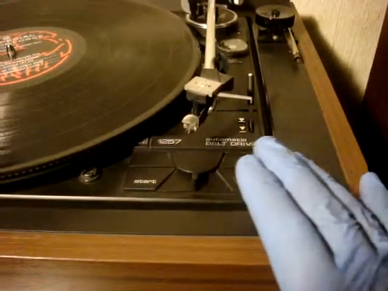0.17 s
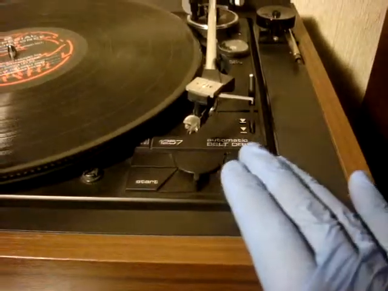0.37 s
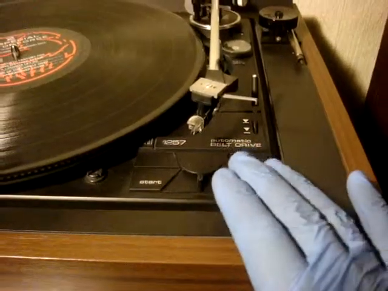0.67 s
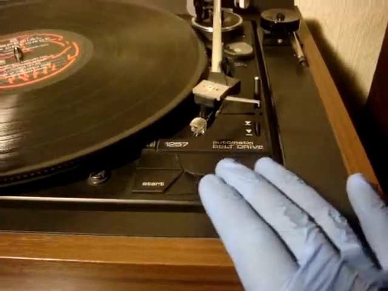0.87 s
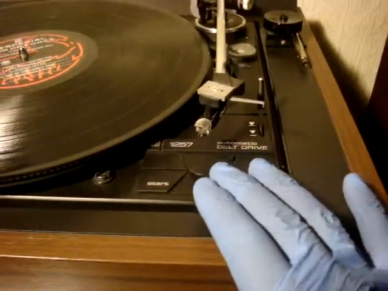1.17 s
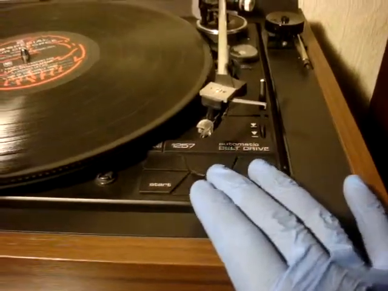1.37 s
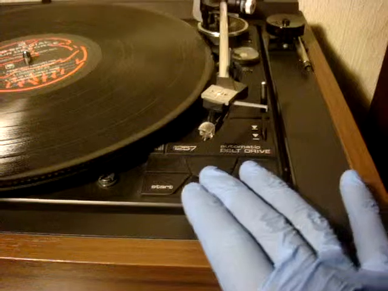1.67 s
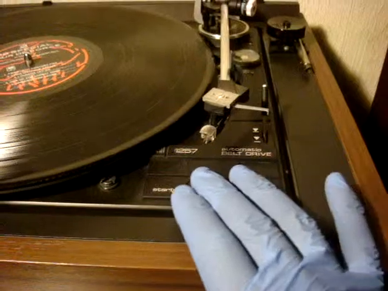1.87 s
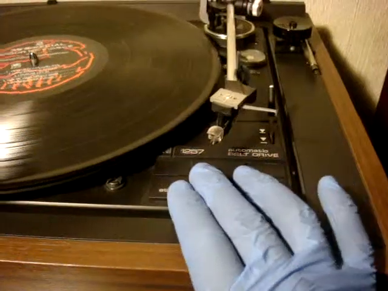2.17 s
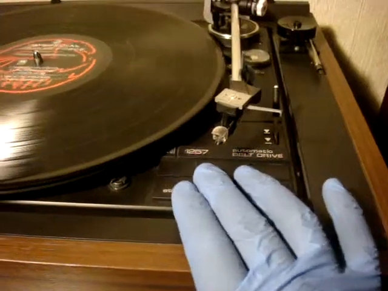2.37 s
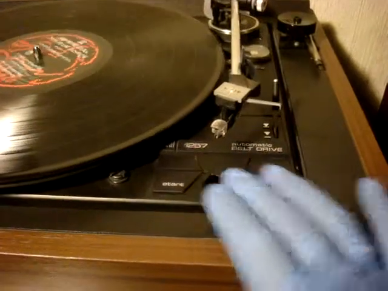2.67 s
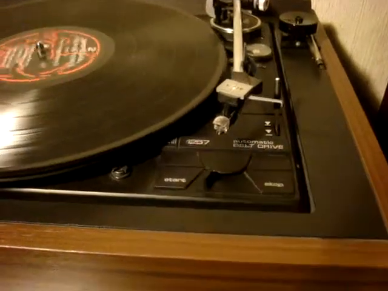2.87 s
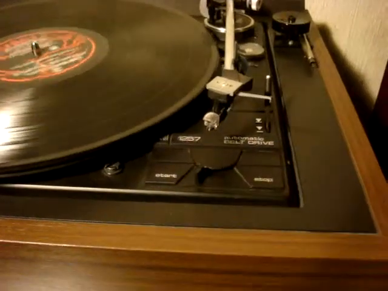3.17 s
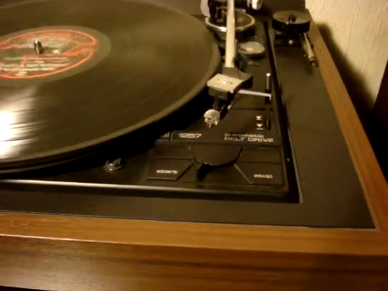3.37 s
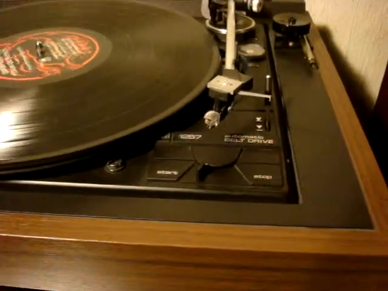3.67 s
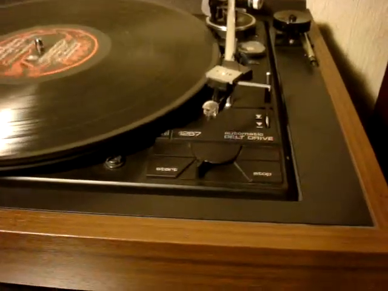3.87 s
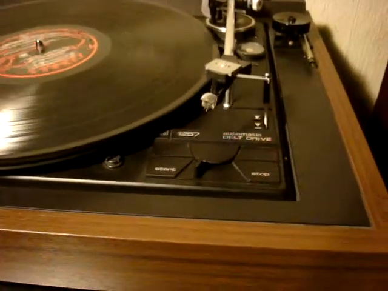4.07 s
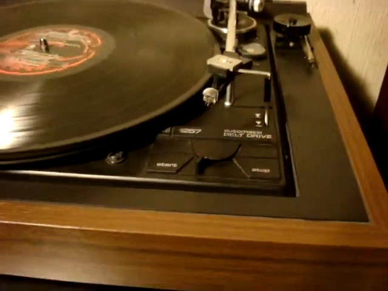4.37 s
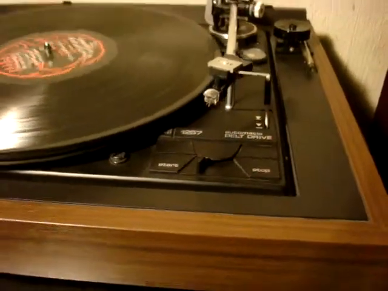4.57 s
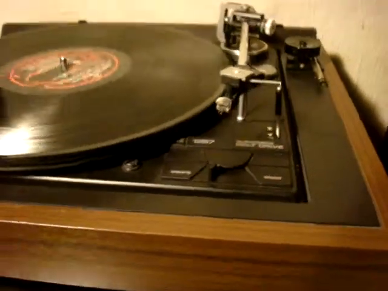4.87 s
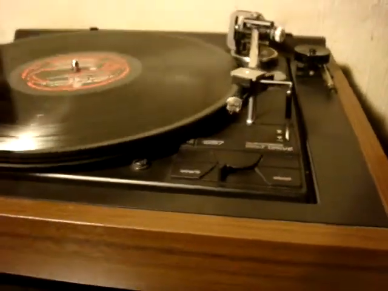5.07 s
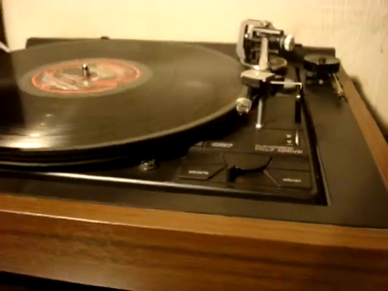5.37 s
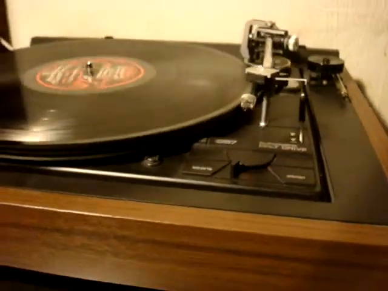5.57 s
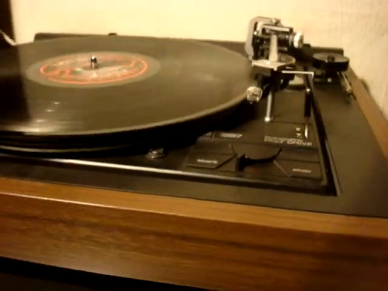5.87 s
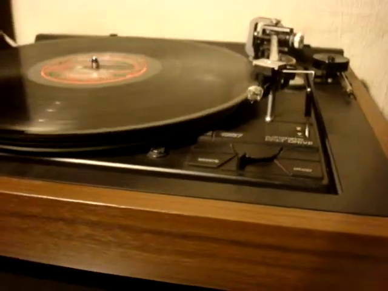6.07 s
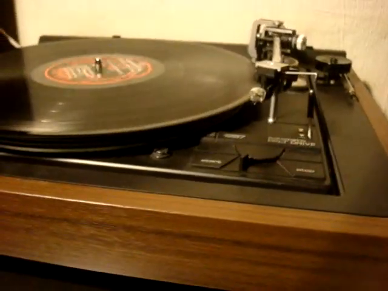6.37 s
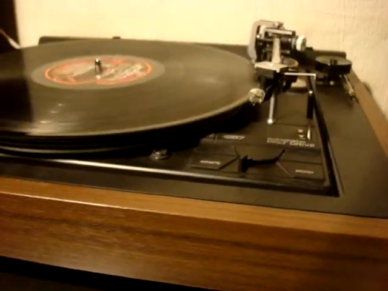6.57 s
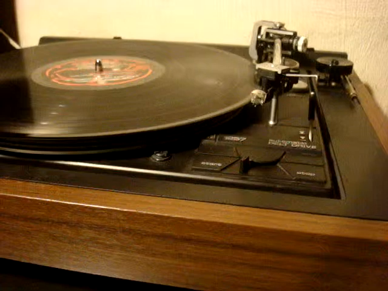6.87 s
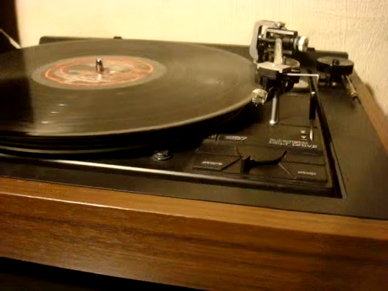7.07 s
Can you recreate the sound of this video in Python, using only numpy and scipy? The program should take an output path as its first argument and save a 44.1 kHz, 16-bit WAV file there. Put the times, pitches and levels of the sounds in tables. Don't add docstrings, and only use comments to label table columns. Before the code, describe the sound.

A quiet room heard through a small camera microphone close to an automatic record player. Soft, steady, rather dull hiss runs for the full 7 seconds, with a barely audible, slightly unsteady motor whine inside it. At about 1.87 s the start lever snaps: a short, hollow, modest click with a tiny rattle, and a faint tick at 2.0 s. Another very faint tick comes at 2.7 s, then a gloved hand slides off with a soft bright rustle around 2.9 s. At 3.11 s a latch springs over, sharp and the loudest sound, followed at 3.15 s by a dry cam strike with a brief steel-deck ring. A small tick follows at 3.33 s. At 3.92 s the arm lift ticks, rounder and lower. At 5.17 s it meets its stop with a bright, rattly clack. Only hiss and whine remain to the end.

```python
import sys
import numpy as np
from scipy import signal
from scipy.fft import rfft, irfft, next_fast_len
from scipy.io import wavfile
from scipy.ndimage import uniform_filter1d

SR = 44100
rng = np.random.default_rng(int(sys.argv[2]) if len(sys.argv) > 2 else 0)


def undo_db(level):
    steps = np.asarray(level, float) / 20
    return 10 ** steps


def dump_mix(stems):
    frames = np.atleast_2d(stems).T
    limited = np.clip(frames, -1, 1)
    pcm = np.round(limited * 32767).astype(np.int16)
    wavfile.write(sys.argv[1], SR, pcm)


N = 318310


def rms_at(x, db):
    return x * undo_db(db) / np.sqrt(np.mean(x ** 2))


def add(out, sound, start_s, peak_db):
    start = int(start_s * SR)
    out[start:start + len(sound)] += undo_db(peak_db) * sound / np.max(np.abs(sound))


def band(x, low_hz, high_hz, edge_hz=140.0):
    padded = np.pad(x, (0, next_fast_len(len(x) + 256) - len(x)), "wrap")
    hz = np.fft.rfftfreq(len(padded), 1 / SR)
    above_low = np.clip((hz - low_hz) / edge_hz + 0.5, 0, 1)
    below_high = np.clip((high_hz - hz) / edge_hz + 0.5, 0, 1)
    return irfft(rfft(padded) * above_low * below_high, len(padded))[:len(x)]


def rattle(rise_ms, rattle_ms, count):
    ms = np.arange(SR // 5) * 1000 / SR
    rise = np.clip(ms / max(rise_ms, 0.1), 0, 1)
    decay = np.exp(-np.maximum(ms - rise_ms, 0) / max(rattle_ms, 0.2))
    return rng.standard_normal((count, len(ms))) * rise * decay


def ring(push, hz, t60_s):
    pole = np.exp(2j * np.pi * hz / SR - np.log(1000) / (max(t60_s, 0.002) * SR))
    return signal.lfilter([1], [1, -pole], push).imag


def blows(events, modes):
    out = np.zeros(N)
    for start_s, peak_db, rise_ms, rattle_ms, crack_db in events:
        contacts = rattle(rise_ms, rattle_ms, count=len(modes) + 1)
        body = sum(rms_at(ring(push, hz, t60_s), db) for push, (hz, db, t60_s) in zip(contacts, modes))
        crack = rms_at(np.diff(contacts[-1], prepend=0), crack_db)
        add(out, body + crack, start_s, peak_db)
    return out


# first contact in seconds, peak in dB, rise in ms, rattle in ms, crack in dB.
LATCH_BLOWS = [
    (3.1105, -18.5, 1.4, 3.7, 5.5),
    (3.1128, -18, 0.58, 2.9, -3.5),
    (3.1164, -20, 0.64, 4, -10),
    (3.120, -28.5, 0.93, 4.4, -13),
]
# pitch in Hz, level in dB, t60 in seconds.
LATCH_MODES = [(528, -16, 0.081), (1008, -11, 0.062), (1652, -8, 0.043), (2470, -8, 0.019),
               (3120, -5.5, 0.012), (3940, -3.5, 0.007), (4560, -7, .012), (5400, -10, .01),
               (6470, -11, 0.014), (7050, -8.5, 0.02), (8530, -9, 0.022), (9400, -10, 0.0056)]


def latch():
    return blows(LATCH_BLOWS, LATCH_MODES)


# first contact in seconds, peak in dB, rise in ms, rattle in ms, crack in dB.
CAM_BLOWS = [
    (3.1535, -23.5, 0.29, 2.2, -11),
    (3.157, -22.5, 0.61, 3, -14),
    (3.161, -27.5, 0.98, 9, -2.5),
    (3.169, -38.5, 0.68, 9.2, -16),
]
# pitch in Hz, level in dB, t60 in seconds.
CAM_MODES = [(594, -8, 0.012), (830, -27, 0.018), (1015, -6, 0.025), (1310, -18, 0.034), (1730, -3, 0.034),
             (2100, -12.5, 0.011), (2570, -4.5, 0.016), (3000, -4, 0.013), (3330, -11, 0.012),
             (4020, -7, 0.0073), (4480, -8.5, .01), (6130, -17, 0.0055), (7340, -19, 0.0056)]
# first contact in seconds, peak in dB, rise in ms, rattle in ms, crack in dB.
DECK_BLOWS = [
    (3.1535, -24, 0.21, 0.2, -41),
    (3.1605, -23, 0.36, 0.8, -40),
]
# pitch in Hz, level in dB, t60 in seconds.
DECK_MODES = [(930, -4.5, 0.089), (1009, -4, 0.082), (1090, -9, 0.066), (1136, 2.5, 0.11), (1300, -10, 0.1),
              (1696, -11, 0.056)]


def cam():
    return blows(CAM_BLOWS, CAM_MODES) + blows(DECK_BLOWS, DECK_MODES)


# first contact in seconds, peak in dB, rise in ms, rattle in ms, crack in dB.
LEVER_BLOWS = [
    (1.8628, -33, 3.2, 3.4, -14),
    (1.867, -28.5, 1.4, 1.6, -14),
    (1.872, -39, 1.2, 3.9, -14),
    (1.8815, -38, 2.9, 1.7, -7),
    (1.888, -38, 1.5, 3.3, -12),
    (1.893, -47, 1.5, 5.0, -10),
]
# pitch in Hz, level in dB, t60 in seconds.
LEVER_MODES = [(1020, -19, 0.03), (1450, 3.5, 0.027), (2040, -16, 0.009), (2600, 2, 0.009),
               (3220, -4.5, 0.0094), (4500, -10, .005), (8200, -8.5, 0.0018)]


def lever():
    return blows(LEVER_BLOWS, LEVER_MODES)


# first contact in seconds, peak in dB, rise in ms, rattle in ms, crack in dB.
LIFT_BLOWS = [
    (3.9158, -30, 1, 3.7, -9),
    (3.9205, -31.5, 0.65, 2.5, -14),
    (3.925, -38, 0.8, 8.1, -14),
]
# pitch in Hz, level in dB, t60 in seconds.
LIFT_MODES = [(957, -4.5, 0.064), (1200, -5.5, 0.05), (1510, -4, 0.023), (1800, -3, 0.014),
              (2180, -22, .008), (2830, -11.5, 0.0046), (3640, -17, .008), (4400, -22, .006),
              (6140, -22, .01), (8600, -13.5, 0.0066), (9900, -20, .008)]


def lift():
    return blows(LIFT_BLOWS, LIFT_MODES)


# first contact in seconds, peak in dB, rise in ms, rattle in ms, crack in dB.
STOP_BLOWS = [
    (5.1648, -28, 1.6, 2.7, -12),
    (5.168, -28.5, 1.3, 3.9, -2),
    (5.174, -33, 1.1, 2.3, -3),
    (5.177, -33, 1.1, 5.4, -1),
]
# pitch in Hz, level in dB, t60 in seconds.
STOP_MODES = [(613, -9.5, 0.037), (1168, -4, 0.038), (2020, -3, 0.011), (2700, -10, 0.0093),
              (3260, -8, 0.012), (4150, -1, 0.014), (4970, -2.5, 0.012), (5550, -5.5, 0.013),
              (6640, -7.5, 0.0042), (7800, -11, 0.0048), (9750, -15, 0.0061)]


def stop():
    return blows(STOP_BLOWS, STOP_MODES)


# start in seconds, peak in dB, rattle in ms, pitch in Hz, overtone gain in dB.
TICKS = [
    (1.9946, -38.5, 7, 2650, 9),
    (2.714, -46, 5.0, 3300, 4),
    (3.069, -41, 7.4, 2200, 4),
    (3.334, -40.5, 8.5, 2500, -2),
    (3.904, -39, 5, 2420, -15),
    (5.144, -46, 7.2, 4250, -14),
]
# multiple of the pitch, level in dB, share of the overtone gain.
LINK_MODES = [(.6, -3, 0), (1, 3.5, 0), (1.35, -2, 1), (1.72, -9, 1)]


def ticks():
    out = np.zeros(N)
    for start_s, peak_db, rattle_ms, pitch_hz, overtone_db in TICKS:
        contacts = rattle(3.1, rattle_ms, count=len(LINK_MODES))
        tick = 0
        for push, (multiple, db, share) in zip(contacts, LINK_MODES):
            tick = tick + rms_at(ring(push, pitch_hz * multiple, 0.0043), db + share * overtone_db)
        add(out, tick, start_s, peak_db)
    return out


def thud():
    out = np.zeros(N)
    push = rattle(rise_ms=2.0, rattle_ms=3.0, count=1)[0]
    add(out, ring(push, 110.0, 0.015), 3.111, -50)
    return out


# time in seconds, level in dB.
GLOVE = [
    (2.84, -90),
    (2.9, -64),
    (2.95, -58.5),
    (2.99, -74),
    (3.04, -85),
]


def glove():
    s, db = np.transpose(GLOVE)
    rustle = band(rng.standard_normal(N), 3500.0, 9000.0, 2500.0)
    return rms_at(rustle, 0) * undo_db(np.interp(np.arange(N) / SR, s, db, -200, -200))


# frequency in Hz, level in dB per Hz.
HISS = [(20, -17.5), (54, -19), (182, -5), (465, -2), (705, -3.5), (1840, -9.5), (2660, -12),
        (10000, -20.5)]


def hiss():
    hz, db = np.transpose(HISS)
    bins = np.maximum(np.fft.rfftfreq(N, 1 / SR), 1)
    colour = undo_db(np.interp(np.log(bins), np.log(hz), db))
    return rms_at(irfft(rfft(rng.standard_normal(N)) * colour, N), -53)


# pitch in Hz, width in Hz, rms level in dB.
WHINE = [
    (2001, 26, -71),
    (3810, 15, -81),
    (7840, 40, -80.5),
]


def whine():
    return sum(rms_at(ring(rng.standard_normal(N), hz, 2.2 / width_hz), db) for hz, width_hz, db in WHINE)


# start in seconds, length in ms, floor at 4 kHz in dB per Hz.
THINNED = [
    (1.852, 48, -106),
    (3.08, 30, -90),
    (3.11, 43, -95.5),
    (3.153, 34.4, -97.5),
    (3.906, 37, -105),
    (5.131, 34, -103),
    (5.167, 35.6, -94.5),
]


def thin_out(x):
    size, hop = 256, 64
    hz, t, z = signal.stft(x, SR, nperseg=size, noverlap=size - hop, scaling="psd")
    power = 2 * np.abs(z[:-1].reshape(-1, 4, len(t))) ** 2
    power = np.repeat(power, 4, axis=0).mean(axis=1)
    power = uniform_filter1d(power, max(int(5.0 * SR / 1000 / hop), 1), axis=1)
    floor = np.full(len(t), -200.0)
    for start_s, length_ms, db in THINNED:
        floor[(t >= start_s) & (t < start_s + length_ms / 1000)] = db
    climb = 3.5 * np.log2(hz[1:, None] / 4000)
    over_db = 10 * np.log10(np.abs(power) + 1e-20) - floor - climb
    z[:-1] *= undo_db(-67 * (1 - np.tanh(over_db / 0.6)) / 2)
    return signal.istft(z, SR, nperseg=size, noverlap=size - hop, scaling="psd")[1][:N]


def punch_holes(x, count):
    t = np.arange(N) / SR
    for when, length, place, wide in rng.random((count, 4)):
        start_s = when * (N / SR - 0.2) + 0.05
        stop_s = start_s + 0.003 + 0.009 * length ** 4
        low_hz = 4400 + 5600 * place ** 1.1
        high_hz = low_hz + 450 + 600 * wide
        near = slice(int(start_s * SR) - 1024, int(stop_s * SR) + 1024)
        fade = np.clip(np.minimum(t[near] - start_s, stop_s - t[near]) / 0.0013 + 0.5, 0, 1)
        x[near] -= (1 - undo_db(-26.0)) * np.sin(fade * np.pi / 2) ** 2 * band(x[near], low_hz, high_hz)
    return x


def side_puffs(count):
    side, size = np.zeros(N), 2048
    for when, place in rng.random((count, 2)):
        start, low_hz = int(when * (N - size)), 4200 + 4100 * place
        puff = rms_at(band(rng.standard_normal(size), low_hz, low_hz * 1.24), -71.5)
        side[start:start + size] += np.hanning(size) * puff
    return side


def scene():
    parts = lever() + latch() + lift() + stop() + cam() + ticks()
    mechanism = band(parts, 370.0, SR, 300.0)
    mono = mechanism + thud() + glove() + hiss() + whine()
    return np.array([mono, mono])


def roll_off(x):
    return signal.sosfilt(signal.butter(12, 10640, fs=SR, output="sos"), x)


def record(dry):
    x = punch_holes(thin_out(dry[0]), count=900)
    x = band(x, 0, 10020, 250.0) + undo_db(-103) * rng.standard_normal(N)
    side = side_puffs(count=12)
    return roll_off(np.array([x + side, x - side]))


dry = scene()
out = record(dry)
dump_mix(out)
```